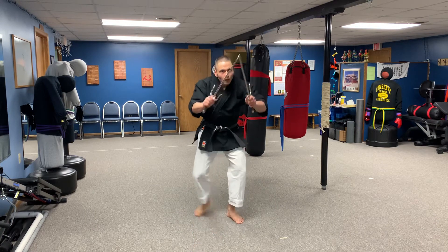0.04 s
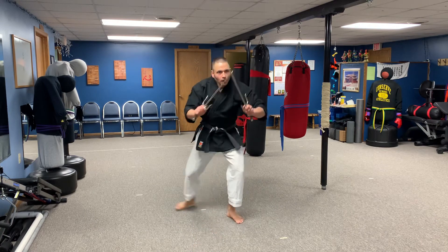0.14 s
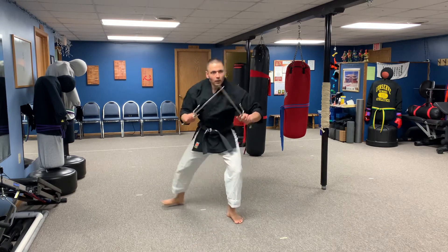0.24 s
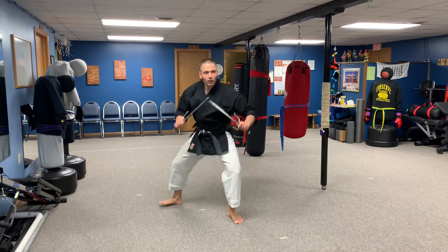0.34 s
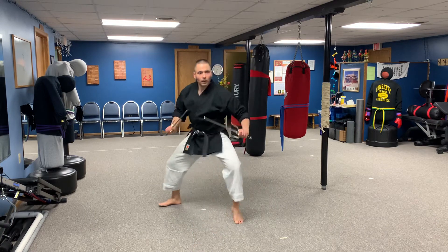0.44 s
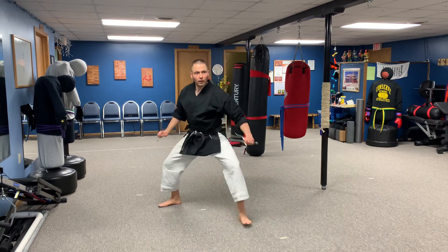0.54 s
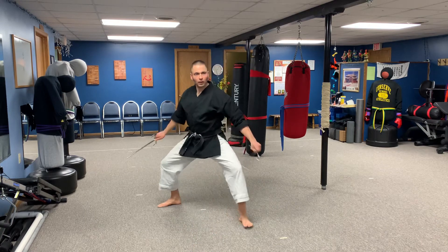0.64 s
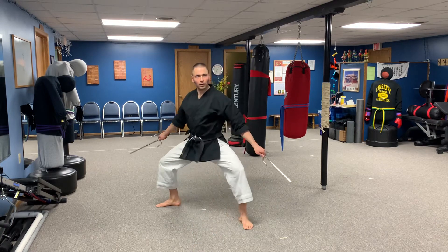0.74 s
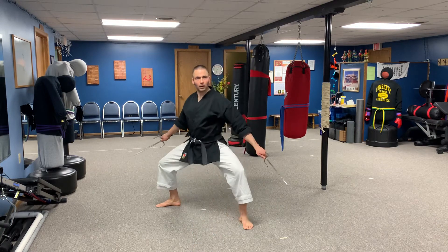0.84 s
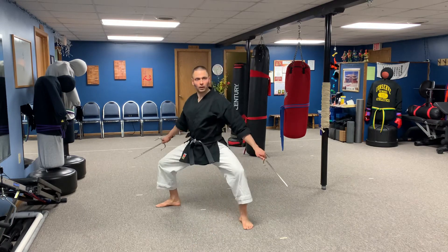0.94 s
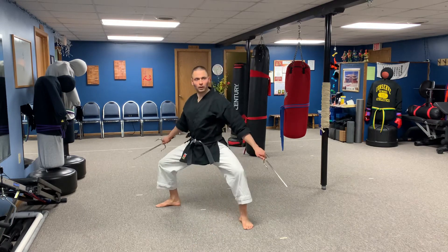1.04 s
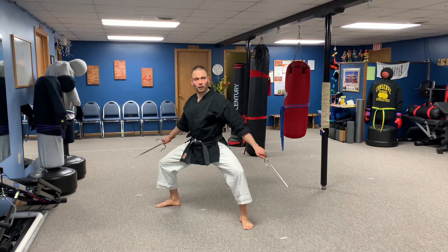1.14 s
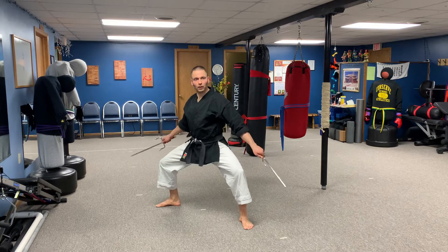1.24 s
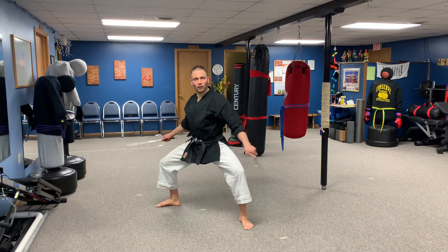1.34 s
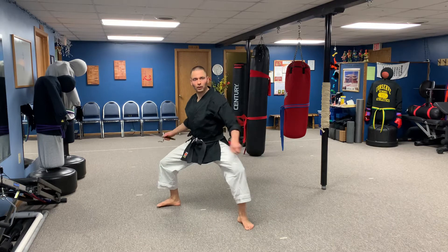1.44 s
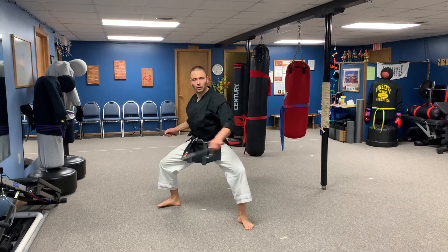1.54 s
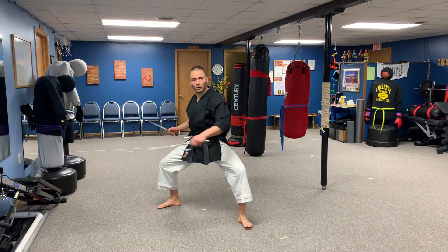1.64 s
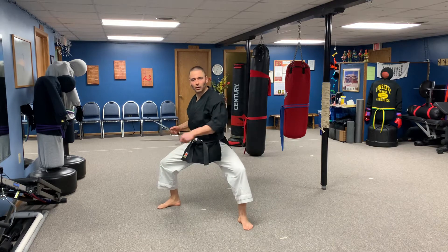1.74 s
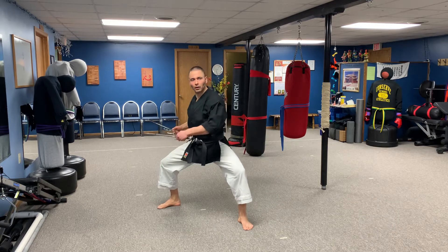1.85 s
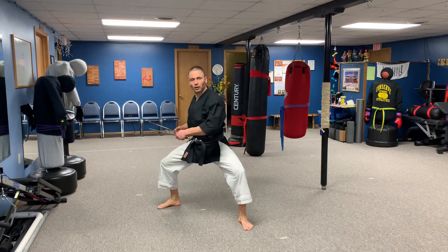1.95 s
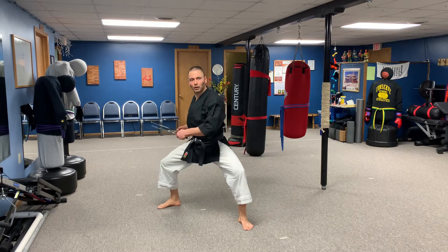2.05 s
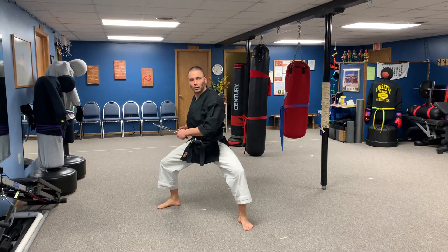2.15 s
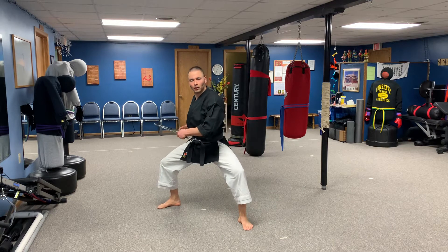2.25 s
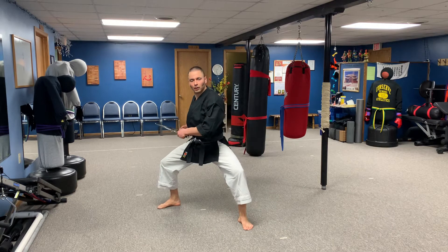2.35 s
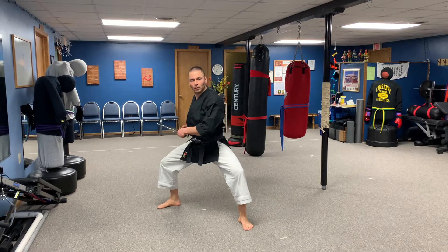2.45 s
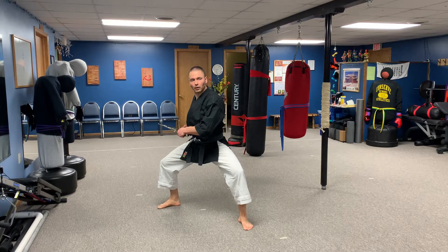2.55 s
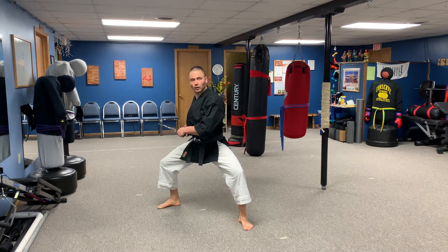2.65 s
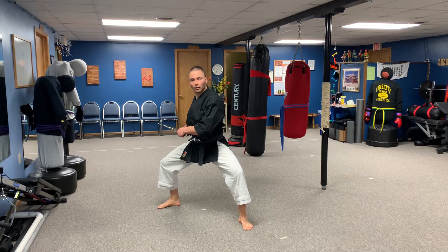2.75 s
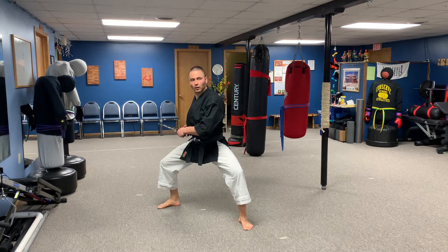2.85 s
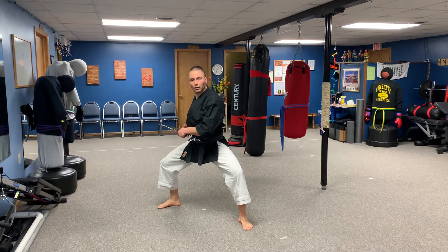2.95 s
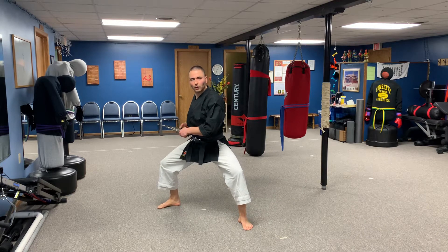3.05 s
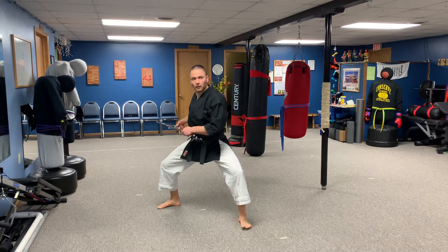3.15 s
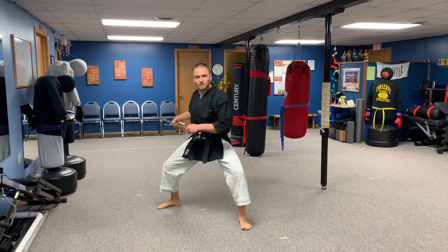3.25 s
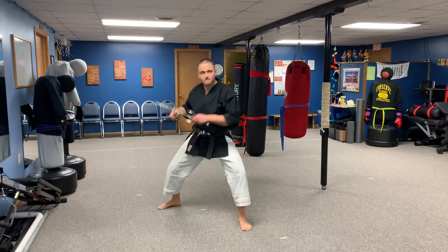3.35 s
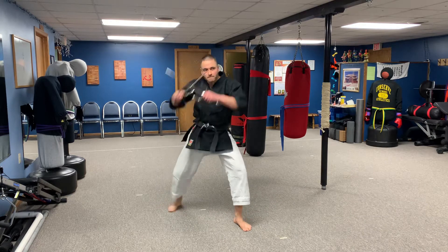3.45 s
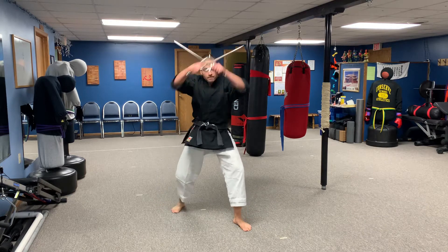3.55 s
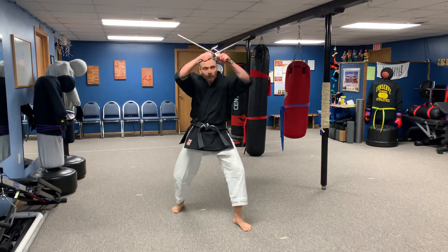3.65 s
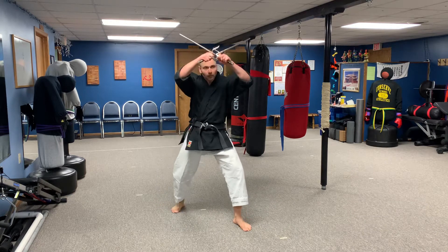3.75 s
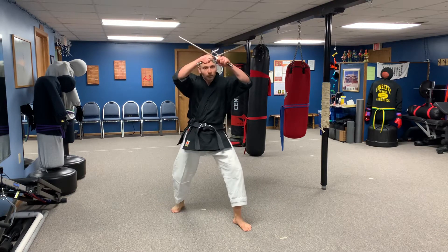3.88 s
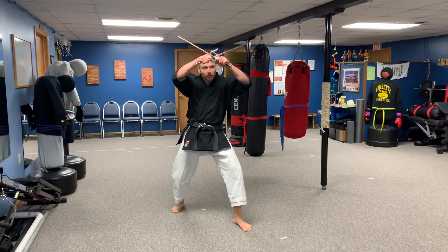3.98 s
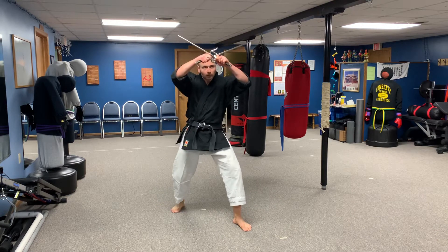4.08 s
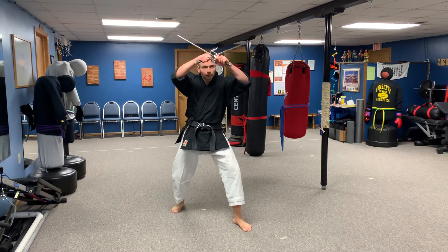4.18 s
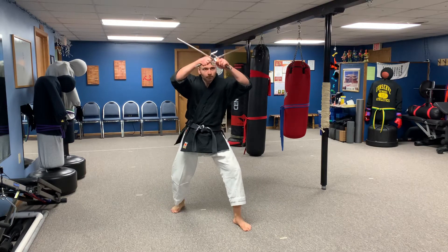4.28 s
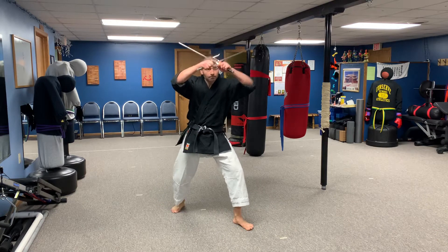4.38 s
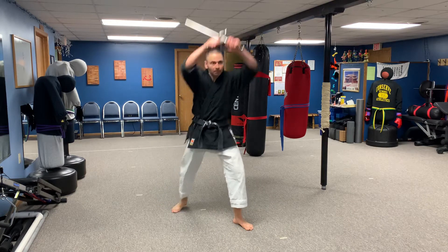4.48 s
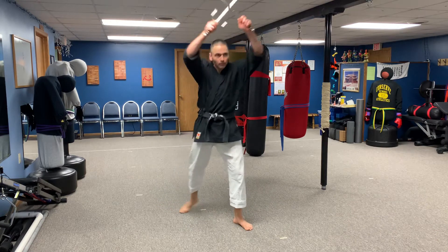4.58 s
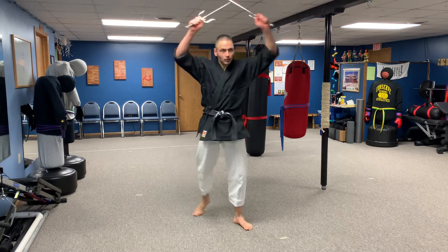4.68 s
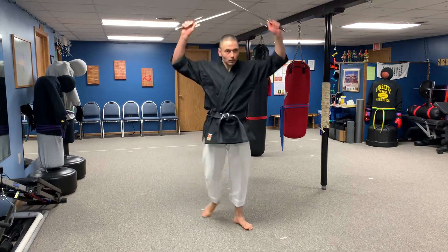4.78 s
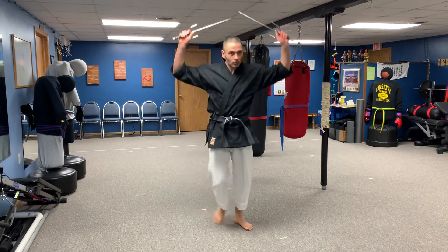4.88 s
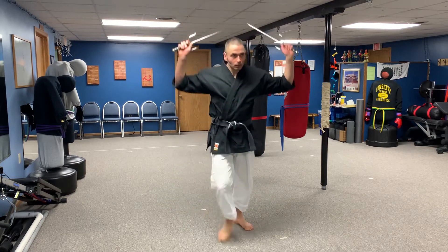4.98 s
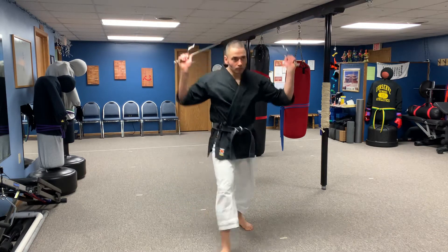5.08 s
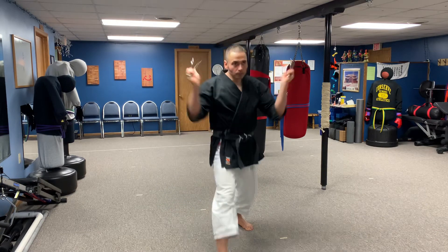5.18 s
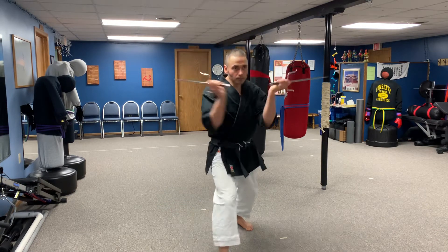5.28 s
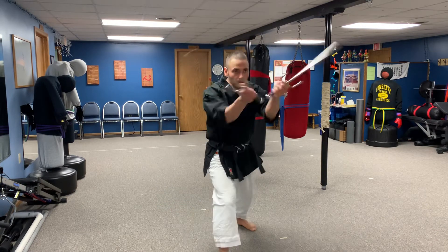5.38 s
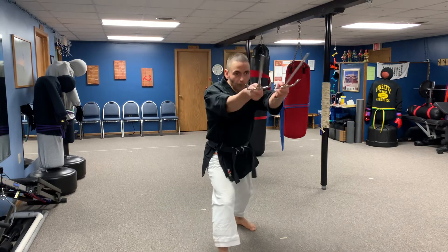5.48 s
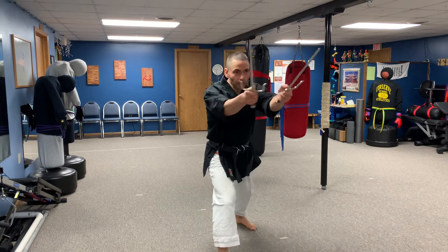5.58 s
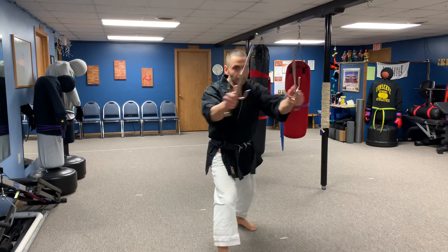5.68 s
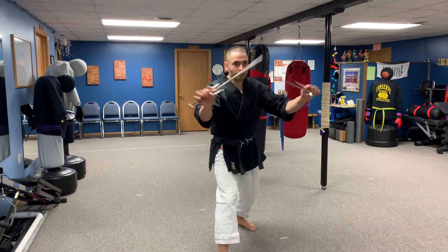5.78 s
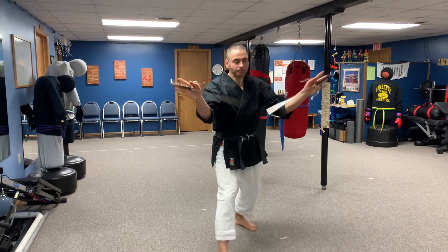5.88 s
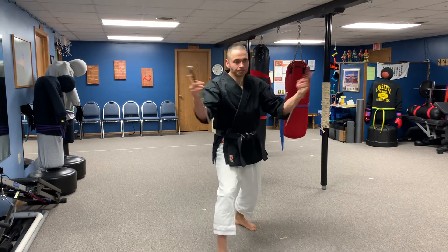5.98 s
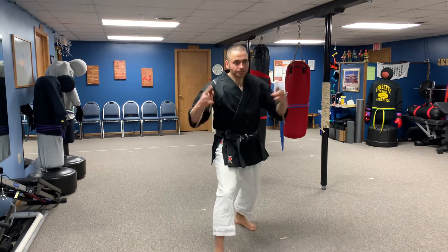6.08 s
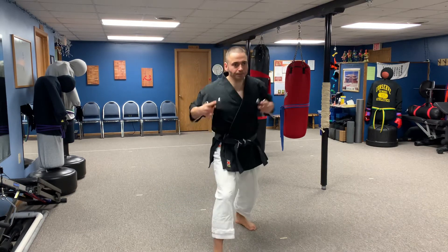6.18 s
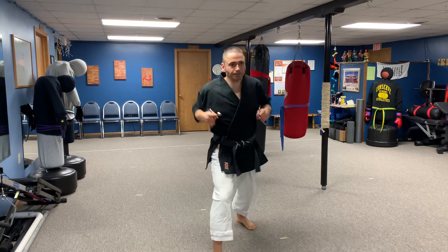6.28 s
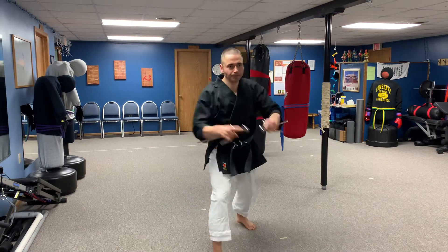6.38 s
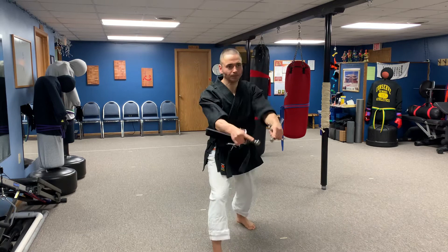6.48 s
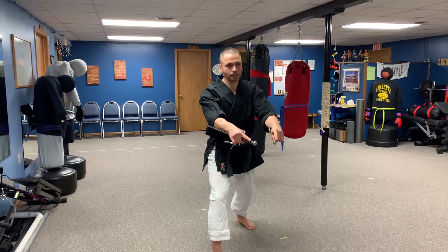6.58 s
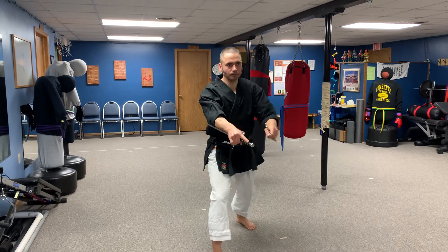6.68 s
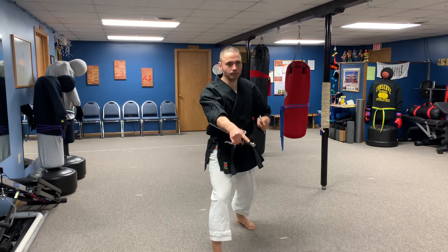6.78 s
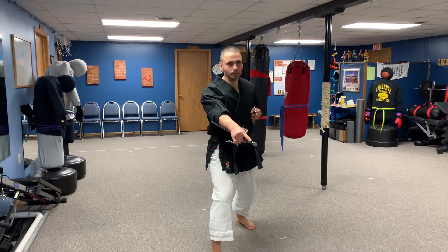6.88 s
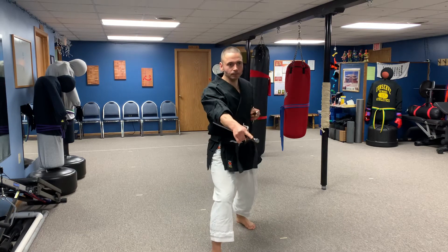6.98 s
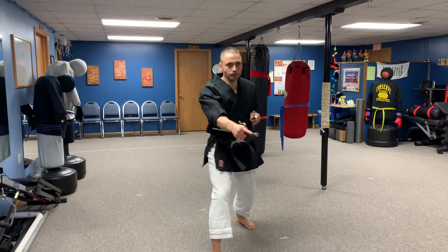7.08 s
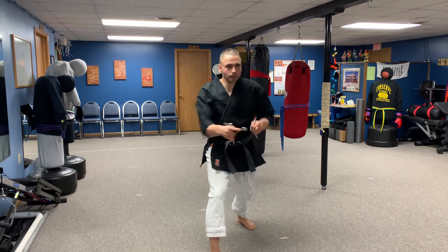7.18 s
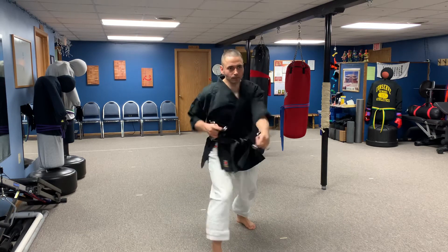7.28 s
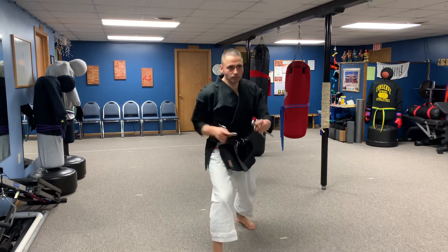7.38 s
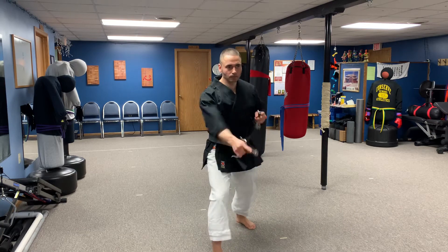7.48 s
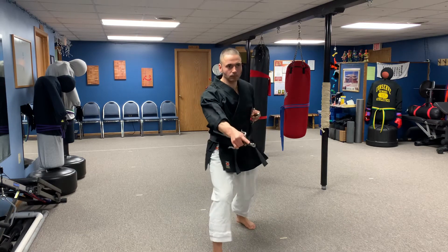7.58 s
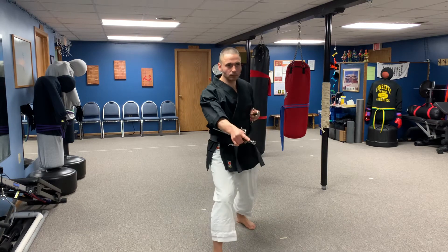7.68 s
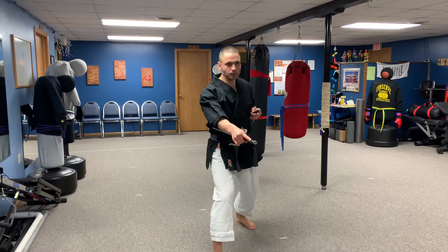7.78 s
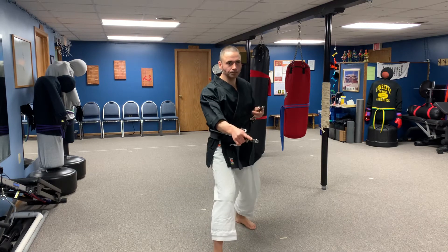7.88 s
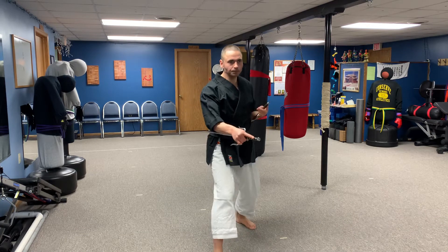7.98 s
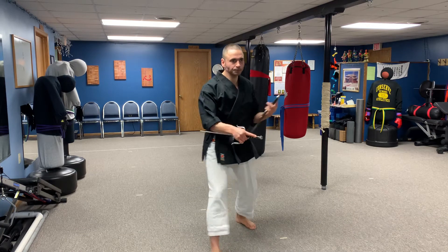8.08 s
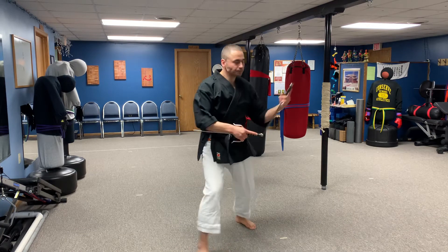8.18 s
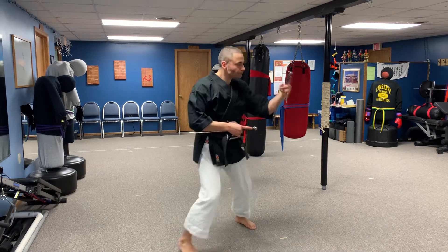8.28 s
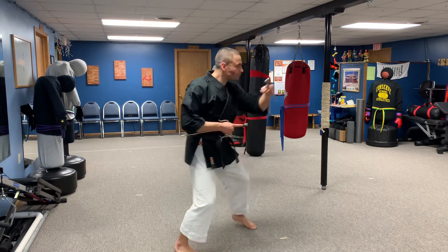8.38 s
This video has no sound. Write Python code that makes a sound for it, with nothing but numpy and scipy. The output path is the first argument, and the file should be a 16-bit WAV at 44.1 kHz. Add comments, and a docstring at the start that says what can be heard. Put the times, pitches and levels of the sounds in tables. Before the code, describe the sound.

Two steel sai clash sharply and ring in a small carpeted hall, with heavy jacket swishes, cloth snaps and soft barefoot thuds over quiet ventilation.

```python
"""A low carpeted hall: a martial artist drills with two steel sai, a few metres from a two-port phone.
Ventilation rumbles and lamps hum: coloured and narrow-band noise.
A heavy jacket flaps and swishes (sparse noise grains) and snaps; bare feet land (damped pops).
Steel ticks in the hand; the sai clink (decaying modes) and slide on each other (resonances driven by grains)."""
import sys
import numpy as np
from scipy import signal
from scipy.fft import rfft, irfft, next_fast_len
from scipy.io import wavfile
from scipy.ndimage import uniform_filter1d

SR = 44100
rng = np.random.default_rng(int(sys.argv[2]) if len(sys.argv) > 2 else 0)


def master(y):
    """Save y as 16-bit WAV."""
    cut = np.clip(np.atleast_2d(y).T, -1, 1)
    pcm = np.round(cut * 32767)  # scale
    wavfile.write(sys.argv[1], SR, pcm.astype(np.int16))


N = 371763
T = np.arange(N) / SR
SIZE = next_fast_len(N + SR)
FREQ = np.fft.rfftfreq(SIZE, 1 / SR)


def amp(db):
    """Decibels to gain."""
    return 10 ** (np.asarray(db) / 20)


def unit(x):
    """Scale to rms 1."""
    return x / np.sqrt(np.mean(x ** 2))


def along(table, hz):
    """Read a (f/Hz, value) table on a log-frequency axis."""
    f, v = np.transpose(table)
    return np.interp(np.log(hz + 1), np.log(f + 1), v)


def colour(x, table):
    """Filter x by a (f/Hz, gain/dB) table."""
    return irfft(rfft(x, SIZE) * amp(along(table, FREQ)), SIZE)[..., :N]


def walk(rate_hz):
    """Random levels held 1 / rate_hz and slewed twice; rms 1."""
    k = int(SR / rate_hz)
    held = np.repeat(rng.standard_normal(N // k + 1), k)
    return unit(uniform_filter1d(uniform_filter1d(held, k), k)[:N])


def grains(rate_hz, spread_db, channels=1):
    """Sparse clicks of either sign with a long-tailed spread of sizes."""
    size = rng.standard_normal((channels, N)) * amp(spread_db * rng.exponential(size=(channels, N)))
    return size * (rng.random((channels, N)) < rate_hz / SR)


def add(out, s, sound):
    """Mix a sound in at time s."""
    i = int(s * SR)
    out[..., i:i + sound.shape[-1]] += sound[..., :N - i]


# ventilation spectrum [f/Hz, relative level/dB]
AIR_SPECTRUM = [(20, -23.5), (35, -17), (60, -8.5), (110, -6.5), (170, -7.5), (250, -15), (320, -17),
                (500, -26.5), (900, -34.5), (1500, -39), (4000, -46), (8800, -49), (12000, -45),
                (15800, -57.5)]
AIR_DB = -64


def ventilation():
    """Broadband flow noise, independent at each port, swelling a little."""
    swell = amp(1.5 * walk(3))
    return amp(AIR_DB) * swell * unit(colour(rng.standard_normal((2, N)), AIR_SPECTRUM))


# lamp hum lines [f/Hz, width/Hz, level/dB]
HUM_LINES = [(112.4, 1.2, -69.5), (241.5, 1.2, -74)]


def lamps():
    """Noise through narrow resonances: a wavering hum."""
    out = np.zeros(N)
    for hz, width_hz, db in HUM_LINES:
        b, a = signal.iirpeak(hz, hz / width_hz, SR)
        out += amp(db) * unit(signal.lfilter(b, a, rng.standard_normal(N)))
    return out


# moves of arms and legs in the jacket
# [start/s, length/s, flap level/dB, swish level/dB, swish treble level/dB]
JACKET_MOVES = [(0.0, .1, -67, -63, -71), (0.205, 0.2, -60.5, -78.5, -78.5),
                (0.444, 0.045, -62.5, -69, -72), (0.635, .16, -60, -73.5, -76.5),
                (1.38, 0.051, -71, -79, -79), (1.504, .25, -80.5, -88, -86.5), (2, .03, -76, -95, -87),
                (3.094, .12, -69, -80, -91.5), (3.241, .1, -65, -75, -86), (3.381, 0.17, -57, -74.5, -85.5),
                (4.45, 0.099, -56.5, -62, -65), (4.62, 0.25, -64, -57, -61), (4.91, 0.098, -56, -66, -73.5),
                (5.114, .02, -58, -55, -72.5), (5.191, .03, -52.5, -67, -72.5),
                (5.26, .15, -55, -66.5, -71.5), (5.577, .22, -73, -84, -78),
                (5.717, 0.014, -76.5, -68.5, -73.5), (5.865, .05, -70.5, -62, -72),
                (5.921, .055, -65, -57.5, -63.5), (6.02, 0.21, -57, -70, -75.5),
                (6.324, .03, -53, -68.5, -71), (6.379, 0.012, -47.5, -61.5, -65.5),
                (6.405, .022, -44, -62.5, -69.5), (6.704, 0.1, -61.5, -75.5, -75),
                (6.81, .085, -62.5, -74.5, -76), (7.057, .08, -64.5, -74.5, -76),
                (7.16, 0.044, -51, -68, -70), (7.239, .04, -43, -59.5, -62.5),
                (7.369, 0.025, -45, -52.5, -61), (7.427, 0.072, -48.5, -65.5, -69),
                (7.73, 0.29, -88, -92, -84), (8.069, .03, -68, -64.5, -65),
                (8.079, 0.17, -60.5, -60.5, -62.5), (8.307, 0.066, -62, -93.5, -85),
                (8.388, .04, -57, -66.5, -66)]
RISE_DB_PER_S, FALL_DB_PER_S = 220.5, 174
SETTLE_DB, SETTLE_DB_PER_S = -14, 70  # cloth stirs before a move, settles slowly after it
ARCH_DB = 4  # a move is weaker at its ends than in its middle


def moves():
    """Gain of flap, swish and treble: every move swells, holds for its length, dies away and settles."""
    power = np.zeros((3, N))
    for start, length, *db in JACKET_MOVES:
        near = slice(max(int((start - .5) * SR), 0), int((start + length + .5) * SR))
        early = np.maximum(start - T[near], 0)
        late = np.maximum(T[near] - start - length, 0)
        arch = np.clip(2 * (T[near] - start) / length - 1, -1, 1) ** 2
        swing = amp(-ARCH_DB * arch - RISE_DB_PER_S * early - FALL_DB_PER_S * late)
        settle = amp(SETTLE_DB - SETTLE_DB_PER_S * (early + late))
        power[:, near] += amp(db)[:, None] ** 2 * (swing ** 2 + settle ** 2)
    return np.sqrt(power)


# cloth spectra: folding creases, rubbing fibres, their treble [f/Hz, relative level/dB]
FLAP_SPECTRUM = [(120, -1.5), (220, 4.5), (400, 1), (700, 0.5), (1150, -6), (1800, -10), (3000, -16),
                 (6000, -48), (12000, -46)]
SWISH_SPECTRUM = [(800, -12.5), (1500, 1.5), (3000, 5), (5000, 2), (7000, -2), (8000, -24.5), (16000, -39)]
SWISH_TREBLE = [(4000, -28), (7000, -6), (8800, -0.5), (10500, -6.5), (12500, -9), (15800, -16)]
CREASE_S = .004


def cloth():
    """Heavy cotton: dull creases folding over and fine fibres rubbing, from the front and spread by the walls."""
    # spectrum, grains/s, flicker/dB
    layers = ((FLAP_SPECTRUM, 1300, 1.6), (SWISH_SPECTRUM, 4000, 1.5), (SWISH_TREBLE, 2500, 1.5))
    out = 0
    for gain, (spectrum, rate_hz, flicker_db) in zip(moves(), layers):
        # a crease is a short dying rasp, not a point
        hits = grains(rate_hz, spread_db=1.0)[0] ** 2
        power = signal.lfilter([1], [1, -np.exp(-1 / (CREASE_S * SR))], hits)
        front, left, right = np.sqrt(power) * rng.standard_normal((3, N))
        creases = 0.64 * front + np.array([left, right])
        out = out + gain * unit(colour(creases, spectrum) * amp(flicker_db * walk(30)))
    return out


def knocks(table, cycles, hiss_db):
    """Short damped pops: a few cycles at their pitch with a puff of noise."""
    out = np.zeros(N)
    for s, db, hz in table:
        turns = np.arange(int(8 * cycles * SR / hz)) * hz / SR
        decay = np.exp(-turns / cycles)
        hiss = amp(hiss_db) * rng.standard_normal(len(turns)) * decay  # decays twice as fast as the tone
        onset = 1 - np.exp(-turns / 0.053)
        add(out, s, amp(db) * (np.sin(2 * np.pi * turns) + hiss) * onset * decay)
    return out


# jacket folds pulled taut [t/s, level/dB, f/Hz]
FOLD_SNAPS = [(0.085, -43, 436), (0.195, -59, 479), (0.226, -41.5, 470.7), (0.3, -40, 463),
              (0.347, -47.5, 407.3), (2.005, -52, 653.7), (3.379, -48, 657), (4.957, -48.5, 491.5),
              (5.186, -42, 511), (5.351, -40, 430.2), (6.089, -49.5, 746.4), (6.132, -38, 605.5),
              (6.316, -40, 721), (6.382, -34, 661.3), (6.419, -41.5, 527.8), (6.692, -48, 802),
              (6.774, -41, 799), (6.819, -44.5, 1149), (6.862, -48.5, 1550), (7.055, -50.5, 1148),
              (7.153, -39.5, 1099), (7.195, -42.5, 800), (7.247, -36, 675), (7.361, -35, 1000),
              (7.384, -37, 1147), (7.434, -33.5, 1100), (7.455, -38.5, 1000), (7.5, -45, 699),
              (8.18, -43.5, 598)]


def snaps():
    """Taut folds pop: under a cycle of decay, little hiss."""
    return knocks(FOLD_SNAPS, cycles=0.84, hiss_db=-19)


# feet landing [t/s, level/dB, f/Hz]
FOOTFALLS = [(0.588, -46.5, 60.8), (0.649, -45.5, 83.4), (1.229, -54.5, 113), (5.229, -45.5, 69.8),
             (5.832, -53.5, 108.4), (6.392, -46.5, 118), (6.699, -50.5, 103.7), (7.223, -49, 100.3),
             (7.369, -46.5, 110)]


def steps():
    """Bare feet land: low, almost pure thuds."""
    return knocks(FOOTFALLS, cycles=1.8, hiss_db=-25.5)


# small dry ticks of steel in the hand [t/s, level/dB, f/Hz]
STEEL_TICKS = [(1.432, -39, 9200), (1.497, -62, 8900), (5.714, -39.5, 5695), (7.86, -60.5, 5050),
               (8.377, -36.5, 5200)]


def ticks():
    """Steel ticks in the hand: high, noisy, dead within a few cycles."""
    return knocks(STEEL_TICKS, cycles=1.5, hiss_db=2.0)


def ring(modes, t, shorten, split, count):
    """Free decay of modes, each split into partners with random shares, phases and small detunings."""
    hz, db, t60 = np.repeat(modes, count, axis=0).T[:, :, None]
    chance = rng.standard_normal((len(hz), 4)).T[:, :, None]
    place = np.tile(np.arange(count) - (count - 1) / 2, len(modes))[:, None]
    hz = hz * (1 + split * (place + 0.3 * chance[2]))
    db = db - 5.5 * abs(place) + 1.5 * chance[0]  # outer partners are weaker
    t60 = t60 * amp(1.5 * chance[3])  # decay times vary at random between partners
    decay = np.exp(-np.log(1000) * t / (t60 * shorten))
    return amp(db) * decay * np.sin(2 * np.pi * hz * t + 2 * chance[1]), hz


# blows; the clash at 3.546 has a second, brighter row 4 ms later
# [t/s, level/dB, first sai/dB, second sai/dB, lengthwise ring/dB, crack/dB,
# brightness/(dB/octave), grip 0 tight - 1 loose, then 7 x favour/dB at FAMILY_HZ]
BLOWS = [(2.141, -33, -13, -26, -3.5, -5.5, 1, 0.34, -1.5, -5, 2.5, 0, 0.5, 1, -0.5),
         (2.235, -36.5, -16, -21.5, 0, -2.5, 1.5, 0.4, 2.5, -4, 1, 3, -2, -0.5, 0.5),
         (2.268, -40, -14.5, -22.5, -14.5, -6.5, -1, 0.37, 0.5, -3, 2, 1.5, 1.5, 1, 1),
         (3.546, -18, -21, -13.5, 0.5, 6, 0, 0.091, 3.5, 5, -1.5, -1, -3, -3, 0.5),
         (3.55, -17.5, -32, -23, -19, 1, 5, 0.089, 2.5, 2.5, -0.5, -1.5, -1, -2.5, -0.5),
         (4.494, -24, -14, -14, 1.5, 1, 0, .6, -2, -2, 2, 1.5, -3, -1, 1.5),
         (4.53, -32.5, -19, -13, -20.5, -12, 4, .5, -4, -2, -0.5, 5, -2, -3, -0.5),
         (4.562, -33.5, -17.5, -15, -15, -7.5, 1.5, .5, -3, -3, -2, 1.5, -0.5, -2.5, 2),
         (4.599, -35, -15.5, -15, -19.5, -14.5, 0, .5, -5, -2.5, -3, 4.5, 6, -4, -1),
         (4.64, -37.5, -15.5, -14, -20, -14, 1.5, .5, -6.5, -8, 2, 4.5, -0.5, -1.5, -2),
         (4.677, -33, -21, -15.5, -14.5, -8.5, 3, 0.6, 9.5, -10.5, 2.5, -3.5, -2, 0, 0),
         (4.693, -39, -15.5, -16.5, -20.5, -5.5, 2.5, 0.39, 0, -8.5, 0, -4, 2.5, -2, -0.5),
         (4.924, -58.5, -14, -25.5, -20, -15, -0.5, 0.2, -4, -6, -3, -8, 7.5, -6, -6)]
# mode-family centres [f/Hz]
FAMILY_HZ = [1570, 1900, 2400, 3300, 4550, 5800, 7100]
# bending modes, each a cluster of shaft and prongs [f/Hz, level/dB, t60/s before grip and spread]
FIRST_BENDING = [(1730, -7, 0.17), (2187, -13.5, 0.31), (2334, -13, 0.35), (2395, -11, 0.37),
                 (3340, -14.5, .3), (3476, -9, 0.22), (4440, -3, 0.27), (4720, -14.5, 0.39),
                 (5550, -12, .2), (5810, -3, 0.088), (7370, -10, 0.16), (6712, -11, 0.13),
                 (6960, 2.5, 0.077), (6800, -6, .2), (7820, -12, 0.05), (9360, -10, 0.76),
                 (10140, -8.5, 0.068), (11000, -15, 0.16), (13330, -12, .15), (13610, -12.5, .15),
                 (14200, -10.5, .2)]
SECOND_BENDING = [(1567, -7.5, 0.21), (1700, -9, 0.25), (1896, -11.5, .22), (1945, -8, 0.19),
                  (2231, -3.5, .2), (2465, -9.5, 0.42), (2640, -10, 0.39), (3189, -6.5, 0.26),
                  (3398, -2, 0.23), (3573, -12, 0.17), (3920, -17.5, .2), (4600, -6, 0.46),
                  (4770, -14.5, 0.089), (5785, -1, 0.21), (6180, -8, 0.092), (6460, -11.5, .15),
                  (7200, -4, 0.17), (7300, -4.5, 0.098), (7752, -9, 0.3), (9200, -5, 0.086),
                  (8970, -9, 0.067), (10140, -14, 0.16), (11500, -9.5, .1), (11800, -4, 0.077),
                  (12300, -9, 0.16), (14000, -10, .2), (15300, -22, .2), (15670, -21.5, .2)]
# lengthwise modes, pure [f/Hz, level/dB, t60 as share of the blow's]
FIRST_LENGTHWISE = [(7310, -4, .35)]
SECOND_LENGTHWISE = [(7556, -1.5, 1.0)]
# hilts and fists [f/Hz, level/dB, t60/s before spread]
HILT_MODES = [(440, -14.5, 0.01), (720, -5.5, 0.024), (972, -3.5, 0.033)]
# contact noise spectrum [f/Hz, relative level/dB]
CRACK_SPECTRUM = [(400, -10.5), (900, -7.5), (1300, -6.5), (1600, -6), (3000, 2.5), (6000, 4.5), (9000, 7),
                  (11500, -1.5), (13500, -4.5), (15800, -21)]
# a tight grip shortens the rings, lets the fists thud and keeps the shafts rattling on each other
LONG_T60_S, LONG_T60_LOOSE_S = 0.17, 1.7
HILT_DB, HILT_LOOSE_DB = -15, -52
RATTLE_DB, RATTLE_PER_S = 4, 260
CONTACT_S = .0004  # the shafts stay in contact for a moment
SWELL_CYCLES = 7  # bending waves need a few cycles to fill the shaft, so low modes come late
BITE_DB, BITE_S = -1.5, 0.011  # part of the ring dies within the first moments
CRACK_S = 0.0022
CLATTER_DB, CLATTER_S = -19, .025  # gripped shafts go on clattering after the crack


def clinks():
    """Each blow rings both sai, damped by the hands, over a crack of countless short modes."""
    out, t = np.zeros(N), np.arange(SR) / SR
    short = t[:SR // 2]
    rise = 1 - np.exp(-t / CONTACT_S)
    bite = 1 + amp(BITE_DB) * np.exp(-short / BITE_S)
    for s, db, first_db, second_db, long_db, crack_db, bright, grip, *favour_db in BLOWS:
        grip = np.clip(grip, 0, 1)
        shorten = 0.51 + 0.36 * grip
        long_t60 = LONG_T60_S + grip * (LONG_T60_LOOSE_S - LONG_T60_S)
        rattle = amp(RATTLE_DB * (1 - 0.78 * grip) * walk(RATTLE_PER_S)[:len(short)])
        sais = ((FIRST_BENDING, FIRST_LENGTHWISE, .005, first_db),
                (SECOND_BENDING, SECOND_LENGTHWISE, .004, second_db))
        for bending, lengthwise, split, share_db in sais:
            waves, hz = ring(bending, short, shorten, split * (2 - grip), count=5)
            waves = waves * (1 - np.exp(-short * hz / SWELL_CYCLES))
            tilt_db = bright * np.log2(hz / 4000) + np.interp(hz, FAMILY_HZ, favour_db)
            bend = np.sum(waves * amp(tilt_db), axis=0)
            add(out, s, amp(db + share_db) * rattle * bend * bite)
            pure = ring(lengthwise, t, long_t60, split=0, count=1)[0].sum(axis=0)
            pure *= amp(3.5 * walk(18)[:SR])  # the long ring wavers randomly in level
            add(out, s, amp(db + share_db + long_db) * rise * pure)
        hilt_db = HILT_DB + grip * (HILT_LOOSE_DB - HILT_DB)
        thud = ring(HILT_MODES, t, 1.0, split=0.064, count=5)[0].sum(axis=0)
        add(out, s, amp(db + hilt_db) * rise * thud)
        clatter = amp(CLATTER_DB) * (1 - grip) * np.exp(-t / CLATTER_S)
        burst = rise * (np.exp(-t / CRACK_S) + clatter) * rng.standard_normal(SR)
        crack = np.zeros(N)
        add(crack, s, amp(db + crack_db) * burst)
        out += colour(crack, [(hz, v + 1.5 * bright * np.log2(hz / 4000)) for hz, v in CRACK_SPECTRUM])
    return out


def gains(tables):
    """Gain over time from level tables; practically silent between them."""
    total = 0
    for table in tables:
        points = np.array(table)
        total = total + amp(np.interp(T, points[:, 0], points[:, 1], -200, -200))
    return total


# strokes of shaft on shaft; the contact point moves the resonances
# [t/s, level/dB, shift/Hz, brightness/(dB/octave)]
SLIDE_STROKES = [
    [(3.05, -93, -330, 6), (3.085, -75.5, -330, 3.5), (3.17, -78.5, -330, 3.5), (3.23, -80, -400, 0.5),
     (3.275, -67.5, -520, 1.5), (3.32, -62.5, -480, 3), (3.345, -63, -420, -0.5), (3.375, -57.5, -300, -1),
     (3.405, -55, -180, -2), (3.435, -50, -0.5, -1), (3.465, -49, -59.5, 2.5), (3.492, -44, -120, 1),
     (3.525, -52, -130, 0.5), (3.545, -42.5, -130, 1.5)],
    [(4.44, -70, -30, 1.5), (4.49, -53, -29.5, 1), (4.62, -57.5, -30.5, 1.5), (4.83, -75.5, -30, 3)],
]
# resonances of the pressed shafts [f/Hz before shift, level/dB, t60/s before PRESSED_SHORTEN]
PRESSED_MODES = [(1570, -1, 0.035), (1945, -8, 0.052), (2160, -8, .04), (2470, -4.5, 0.071),
                 (2840, 2, 0.045), (3160, -4.5, 0.057), (3260, -6.5, 0.038), (3860, -5, 0.044),
                 (3970, -1, 0.06), (4860, -1, 0.063), (5340, -7, .03), (6400, -2.5, 0.039),
                 (7150, -5, 0.041), (10200, -5, 0.017), (10317, -11, 0.016), (11600, -12.5, .015),
                 (13900, -16.5, 0.018)]
PRESSED_SHORTEN = 0.79


def slides():
    """Rough steel catching and slipping drives the pressed resonances, which glide with the contact point."""
    s, level_db, shift_hz, bright_db = np.concatenate(SLIDE_STROKES).T
    shift, bright = np.interp(T, s, shift_hz), np.interp(T, s, bright_db)
    catches = grains(8000, spread_db=1.5)[0] * amp(2.5 * walk(90))
    light_db = np.clip(np.interp(T, s, level_db) + 61, -14, 0)  # a light touch hardly stirs the top modes
    body = 0
    for hz, db, t60 in PRESSED_MODES:
        turn = np.exp(2j * np.pi * np.cumsum(hz + shift + 70 * walk(15)) / SR)
        # decay seen from the turning mode
        pole = 1000. ** (-1 / (PRESSED_SHORTEN * t60 * SR))
        held = signal.lfilter([1], [1, -pole], catches / turn)
        mode_db = db + bright * np.log2(min(hz, 5000) / 3000) + light_db * (hz > 5000)
        breakup = amp(4.5 * walk(45))  # each strand breaks up under its own random level
        body = body + amp(mode_db) * breakup * np.imag(held * turn) / np.sqrt(t60)
    rasp = amp(-3.5) * unit(colour(catches, CRACK_SPECTRUM))
    thin = signal.butter(4, 1250, "high", fs=SR, output="sos")  # slim shafts radiate no bass
    return gains(SLIDE_STROKES) * signal.sosfilt(thin, unit(body) + rasp)


# reverberation [f/Hz, t60/s]
HALL_T60 = [(200, 0.89), (800, 0.22), (3000, 0.37), (8000, 0.22), (14000, 0.058)]
# early echoes off carpet and ceiling [delay/s, level/dB]
EARLY_ECHOES = [(.0037, -7), (.0083, -10)]
HALL_DB = 1  # energy of the dense tail re direct sound
LEFT_LATE = 2  # samples by which direct sound reaches the left port later


def hall(x):
    """Direct sound, two early echoes and a dense tail that dies band by band, different at each port."""
    t, tail = np.arange(SR // 2) / SR, 0
    for hz in 150 * 2. ** np.arange(7):
        top_hz = hz * np.sqrt(2) * (1.4 if hz > 9000 else 1)
        sos = signal.butter(2, [hz / np.sqrt(2), top_hz], "band", fs=SR, output="sos")
        fall = np.exp(-np.log(1000) * t / along(HALL_T60, hz))
        tail = tail + fall * signal.sosfilt(sos, rng.standard_normal((2, len(t))))
    tail = tail * (1 - np.exp(-t / 0.0013))
    tail = amp(HALL_DB) * tail / np.sqrt(np.sum(tail ** 2, axis=1, keepdims=True))
    for late, db in EARLY_ECHOES:
        tail[:, int(late * SR)] += amp(db)
    ports = np.array([np.roll(x, LEFT_LATE), x])
    return ports + signal.fftconvolve(x[None], tail, axes=1)[:, :N]


def scene():
    """Steel, snaps and feet excite the hall; cloth, ventilation and lamps are added as they are."""
    struck = clinks() + slides() + snaps() + ticks() + steps()
    return hall(struck) + cloth() + ventilation() + lamps()


# likeness of the two channels [f/Hz, share 0-1]
PORT_LIKENESS = [(25, .85), (130, 0.9), (290, 0.47), (640, 0.11), (5500, 0.096), (7000, 0.66), (7800, 0.95),
                 (16000, 1)]
# phase of the right channel against the left [f/Hz, half turns]
PORT_PHASE = [(0, 0), (6800, 0), (7900, 1), (9200, 1), (10400, 2), (11800, 2), (12500, 3), (14500, 3),
              (15000, 4), (16500, 4)]
# channel balance [f/Hz, left over right/dB]
PORT_BALANCE = [(60, 2), (200, -2), (500, 0.5), (1200, 1), (2200, 1), (4500, -2), (8000, 0)]
TOP_HZ = 16200


def record(dry):
    """Channels share bass and high treble; treble alternates between in phase and antiphase; the top is cut."""
    left, right = rfft(dry, SIZE)
    like = np.clip(along(PORT_LIKENESS, FREQ), 0, 1)
    phase = np.exp(-1j * np.pi * np.interp(FREQ, *np.transpose(PORT_PHASE)))
    # blending raises sound the channels already share: rescale to the right one's own level
    blend = like * left * phase + np.sqrt(1 - like ** 2) * right
    own_power = uniform_filter1d(abs(right) ** 2, size=2000)
    blend *= np.sqrt(own_power / uniform_filter1d(abs(blend) ** 2, size=2000))
    balance = amp(np.outer([.5, -.5], along(PORT_BALANCE, FREQ)))
    both = irfft(np.array([left, blend]) * balance, SIZE)[:, :N]
    return signal.sosfilt(signal.ellip(10, .2, 70, TOP_HZ, fs=SR, output="sos"), both)


dry = scene()
out = record(dry)
master(out)
```